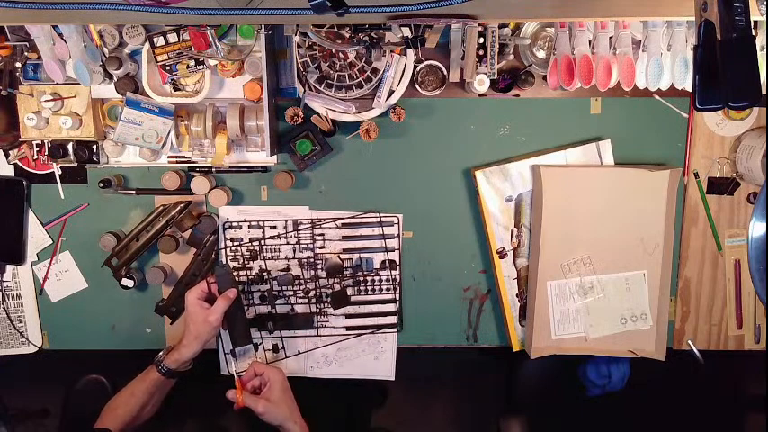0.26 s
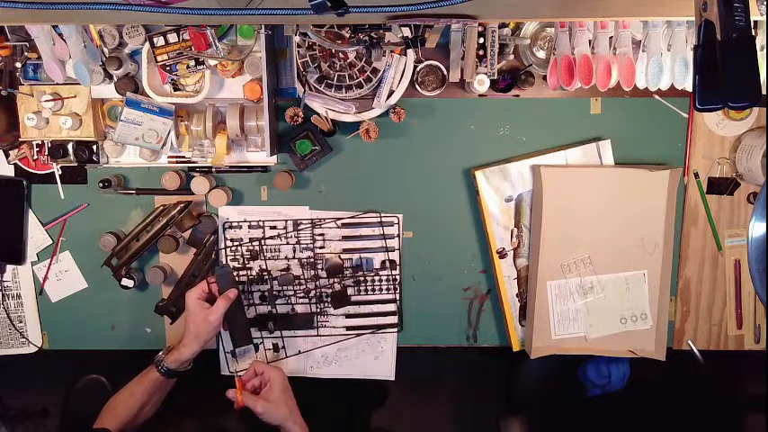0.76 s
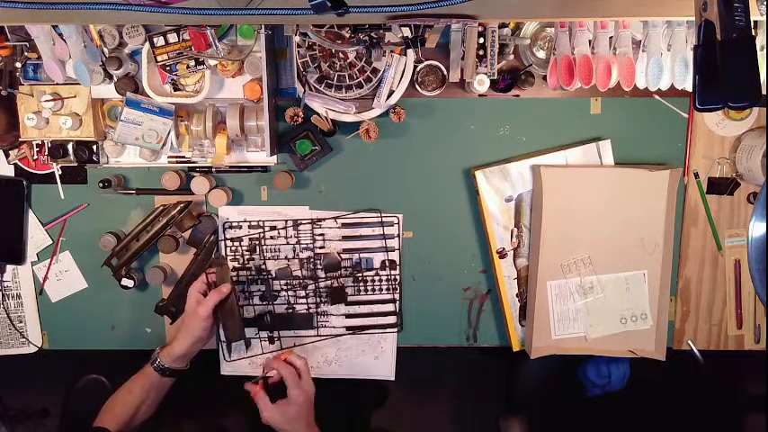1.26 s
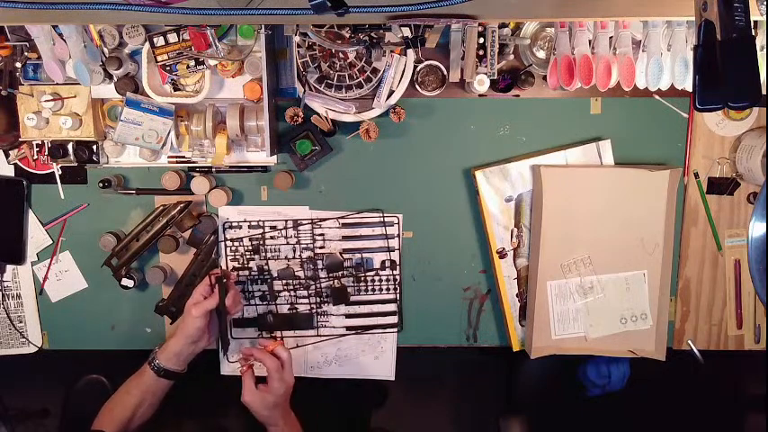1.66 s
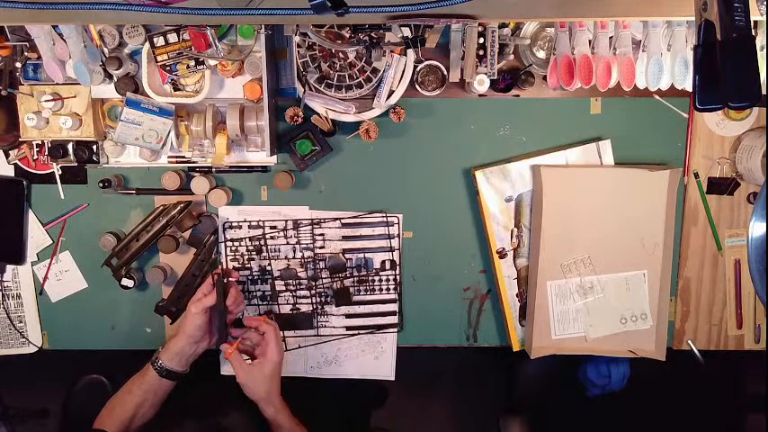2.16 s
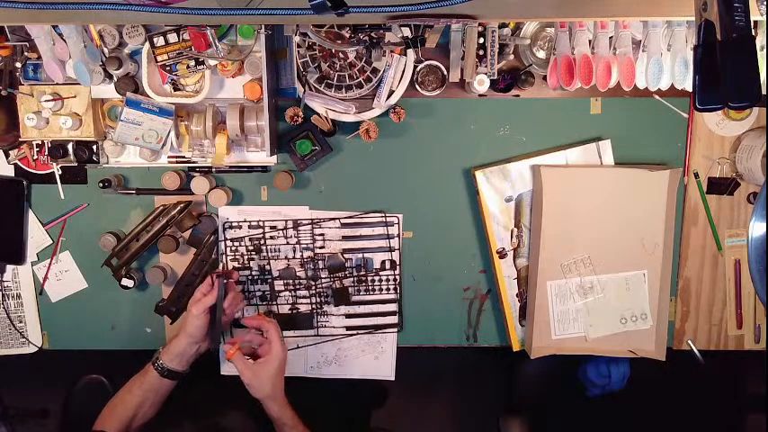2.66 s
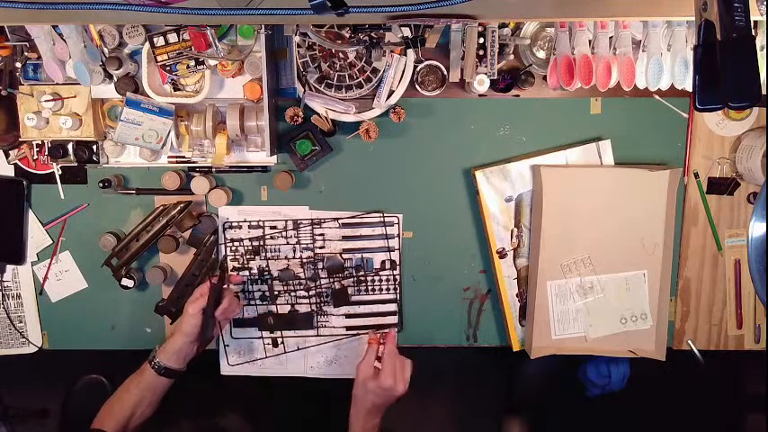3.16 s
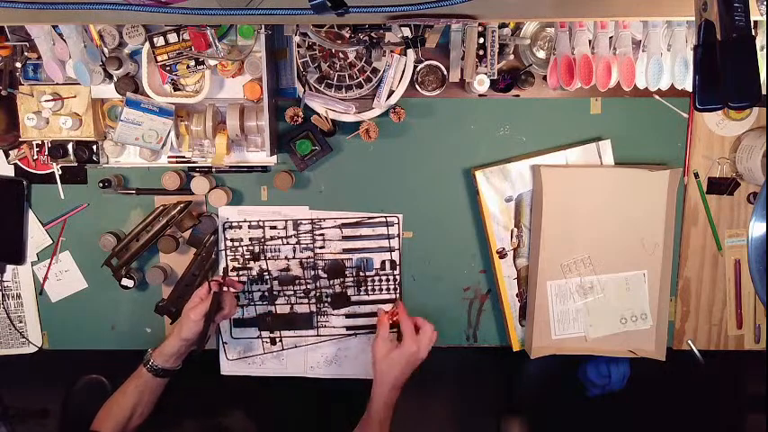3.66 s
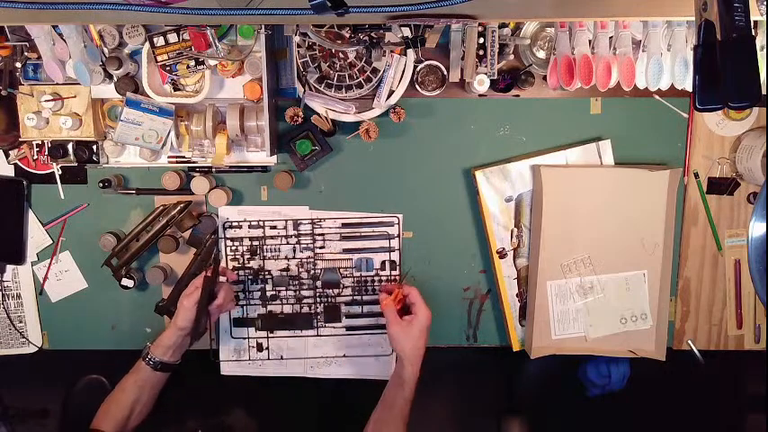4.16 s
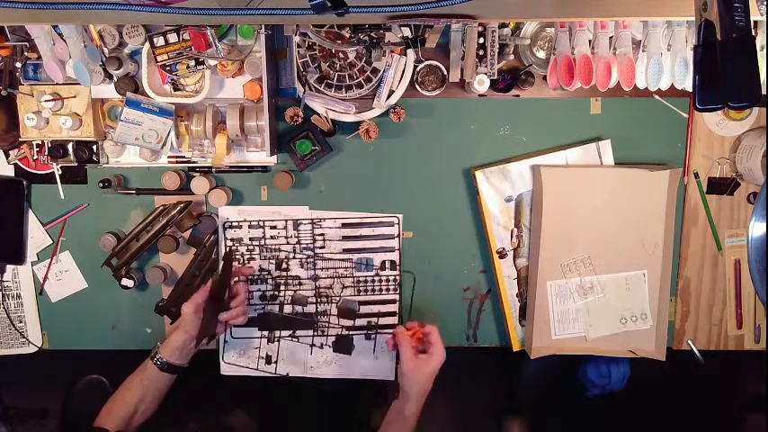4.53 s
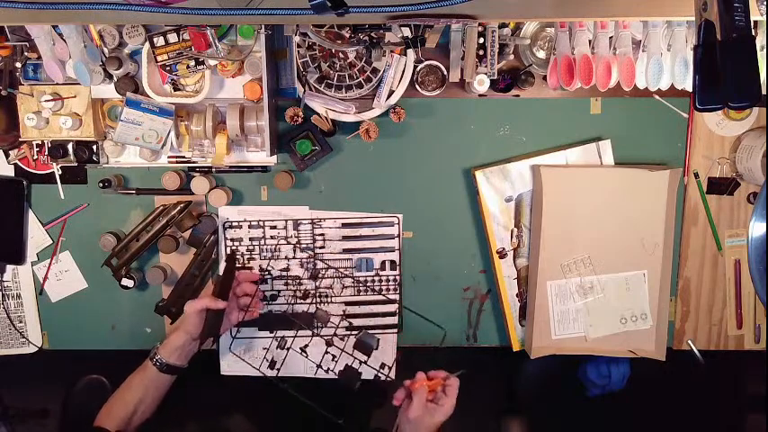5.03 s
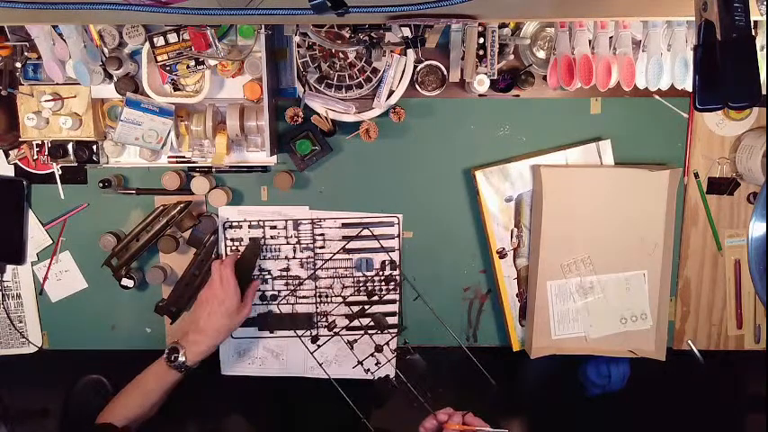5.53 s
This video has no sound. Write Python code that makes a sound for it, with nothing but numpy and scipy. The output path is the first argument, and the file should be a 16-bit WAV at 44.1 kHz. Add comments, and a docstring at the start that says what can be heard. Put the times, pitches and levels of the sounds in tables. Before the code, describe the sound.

One hard, bright snip of hand cutters in a quiet workroom, followed by sparse plastic ticks, finger rustles and a light clatter on the desk.

```python
"""Plastic part snipped from its frame

Cutters snip the part in a small, damped room: noise cracks, and the jaws and plastic stub ring as modes.
The part then ticks and rustles in the fingers (shaped noise); the lifted frame knocks on the desk (modes).
A motor just under mains rate beats slowly with the mains hum (sines); a fan and a rush of air join in."""
import sys
import numpy as np
from scipy import signal
from scipy.fft import rfft, irfft
from scipy.io import wavfile
from scipy.ndimage import uniform_filter1d

SR = 44100
rng = np.random.default_rng(int(sys.argv[2]) if len(sys.argv) > 2 else 0)


def pcm_store(signal):
    """Save signal as 16-bit PCM."""
    levels = np.round(np.clip(np.atleast_2d(signal), -1, 1) * 32767)
    wavfile.write(sys.argv[1], SR, levels.astype(np.int16).T)


N = 255406

# snip stages: plastic tearing and parting, jaws slamming shut, two rebounds:
# (time [s], relative level [dB], decay constant [s])
SNIP_STAGES = [(0.6389, -8.5, 0.00094), (0.6396, -3, 0.00045), (0.6401, -1, 0.00022),
               (0.6409, -5.5, 0.00081), (0.6436, -11.5, 0.0023)]
# modes of jaws and stub: (frequency [Hz], relative level [dB], t60 [s])
JAW_MODES = [(526, -30.5, 0.086), (872, -19.5, 0.063), (1250, -17.5, 0.026), (2060, -13.5, 0.024),
             (3060, -5.5, 0.014), (3660, -10.5, 0.021), (5396, -16, 0.036), (6660, -9, 0.0077),
             (6730, -8.5, 0.0058), (6380, -26, 0.013), (8280, 3, 0.0087), (8970, -7.5, 0.014),
             (9270, -2, 0.023)]
# crack spectrum: (frequency [Hz], relative density [dB per Hz])
CRACK_SPECTRUM = [(240, -46), (500, -38), (900, -6), (1500, -18), (2100, -6), (4000, -6.5), (5000, -5),
                  (5600, 2.5), (6800, 4), (9300, -5), (10600, -5.5), (13000, -14), (16000, -35)]
CRACK_GAIN_DB, JAW_PEAK_DB = 7, -10.5

# small parts ticking:
# (time [s], dry peak [dB], brightest frequency [Hz], decay constant [s], body level [dB])
PART_TICKS = [(0.831, -51, 6300, .012, -20), (.9602, -43, 7600, 0.0011, -18), (1.253, -49, 6840, .003, -19),
              (1.4477, -34, 8000, 0.0028, -14), (1.4498, -27, 6600, 0.0067, -6),
              (1.47, -41, 7350, .004, 11), (1.499, -38, 7000, 0.0071, -3), (1.518, -44, 5600, .004, -9),
              (1.995, -39, 7800, 0.0087, -7), (2.188, -47.5, 7500, 0.014, -6),
              (2.215, -45.5, 7900, .005, 1), (2.559, -43.5, 7700, 0.0045, -17),
              (2.8655, -26.5, 7100, 0.0011, -22), (3.7194, -47, 8200, 0.0085, 5),
              (3.736, -42.5, 7060, 0.014, -10), (3.857, -44, 7440, 0.0083, -12),
              (4.1085, -40, 7400, 0.016, 0.5), (4.187, -55, 7050, .003, 4), (5.507, -46, 8500, .004, -12),
              (5.553, -50, 5400, .004, -17), (5.573, -44, 5330, .004, -18), (5.6283, -28, 7200, 0.003, -12)]
# thin pitched ticks: (time [s], dry peak [dB], pitch [Hz], decay constant [s])
PITCHED_TICKS = [(.926, -56, 9550, .005), (1.043, -55, 9700, .004), (1.487, -51, 8900, .004),
                 (2.273, -54.5, 8960, 0.017), (2.464, -54.5, 9600, 0.037), (2.586, -45, 8340, 0.006),
                 (4.112, -47, 5400, .008), (4.132, -48, 5330, 0.005), (4.62, -57, 9200, .01),
                 (5.73, -39, 5770, .0017)]
# dull bump of the frame under one tick:
# (time [s], dry peak [dB], brightest frequency [Hz], decay constant [s])
FRAME_BUMP = (3.736, -40, 1600, .013)
# distance below the top at which the hump is 6 dB down
TICK_OCTAVES, PITCHED_OCTAVES, BUMP_OCTAVES = 0.41, 0.094, 1
UPPER_SKIRT = 1.29  # the hump is this much wider above its top
TICK_BODY_HZ, PITCHED_BODY_DB, BUMP_BODY_DB = 2760, -30, -19

# frame on desk: (time [s], dry peak [dB], hardness [dB per octave], lift of the 3 kHz modes [dB])
FRAME_KNOCKS = [(1.507, -45.5, 2, -6), (1.521, -55, 1, -6), (4.234, -54, -5, 2), (4.292, -55, -5, -3),
                (4.383, -40.5, 5.5, -3), (4.409, -45, 7, -13), (4.451, -49, 0.5, -7), (5.428, -48, 2, -9),
                (5.6257, -29, 1.5, 3), (5.6305, -27, 6, 9), (5.673, -33, 4.5, -4), (5.677, -33.5, 2.5, 9),
                (5.684, -37.5, 10, 16), (5.762, -46, 0, -2), (5.782, -33, -0.5, 3)]
# frame modes, before grip detuning: (frequency [Hz], relative level [dB], freely ringing t60 [s])
FRAME_MODES = [(2250, -5, 0.023), (2390, 2, 0.092), (2500, -6, 0.03), (3075, -4, 0.024),
               (2866, -7.5, 0.035), (4120, -4, 0.012), (5000, -5, 0.021), (5530, -5.5, 0.022),
               (6800, -9, 0.017), (7520, -8, 0.039), (8630, -13, .02), (9100, -14, 0.015)]
GRIP_DETUNE = .012  # spread of each mode's frequency from knock to knock, as a share
# a lighter knock leaves the frame resting on the desk, ringing this share as long
LIFTS_OFF_DB, RESTING_RING = -40, .5
# contact decay constant at hardness 0; hardness step that halves it [dB per octave]
KNOCK_S, HALVING_DB = .005, 10

# fingers sliding over plastic, one list per slide: (time [s], level [dB])
FINGER_SLIDES = [
    [(.8, -70), (.86, -62.5), (1., -77), (1.14, -66), (1.22, -67), (1.3, -64.5), (1.42, -67)],
    [(2.17, -65), (2.35, -80), (2.45, -70), (2.6, -72)],
    [(3.72, -62), (3.74, -51), (3.77, -70)],
    [(4.17, -60), (4.27, -73)],
    [(4.76, -82), (4.82, -66), (4.88, -82)],
    [(5.5, -57.5), (5.62, -58), (5.7, -52.5), (5.76, -53), (5.79, -51)],
]

# reverberation: (frequency [Hz], t60 [s])
ROOM_T60 = [(500, 0.31), (2000, 0.13), (6000, 0.14), (12000, 0.11)]
ROOM_DB, ROOM_BUILDUP_S = -6, .004

# motor and mains tones and their sums: (motor multiple, mains multiple, rms [dB])
HUM_TONES = [(1, 0, -55), (0, 1, -61), (0, 2, -68), (3, 0, -71), (1, 2, -72), (0, 3, -75), (4, 0, -76),
             (2, 2, -72), (0, 4, -68), (5, 0, -74), (25, 0, -81)]
MOTOR_HZ, MAINS_HZ, IN_STEP_S = 58.43, 59.97, .269
# blade tones, three blades per turn: (shaft multiple, rms [dB])
BLADE_TONES = [(3, -62), (6, -74), (9, -78), (12, -82)]
# whine and its sidebands one turn away: (offset [shaft multiples], rms [dB])
WHINE_TONES = [(-1, -76), (0, -74), (1, -79)]
FAN_HZ, FAN_WHINE_HZ = 22.39, 567.7

# air rush spectrum: (frequency [Hz], relative density [dB per Hz])
AIR_SPECTRUM = [(5, -13), (12, -2), (45, -2.5), (64, -2), (95, -6.5), (135, -13), (215, -10.5),
                (270, -12.5), (400, -17), (600, -17), (950, -20), (1250, -18.5), (2140, -23.5),
                (4500, -28.5), (7310, -25.5), (9500, -35), (12000, -41), (16000, -42.5)]
AIR_RMS_DB = -53.5

TOP_HZ = 15900
LEAD_S = .005  # silence ahead of the touch in each burst


def snip():
    """Cutters: a run of broad cracks; each also rings the jaws and the stub of plastic."""
    blows = np.zeros(2 ** 16)
    for time_s, db, decay_s in SNIP_STAGES:
        add(blows, time_s, burst(decay_s), db)
    blows = flatten(blows, width_hz=750)
    cracks = undb(CRACK_GAIN_DB) * colour(blows, CRACK_SPECTRUM)
    jaws = ring(blows, JAW_MODES)[:len(blows)]
    jaws = jaws * undb(JAW_PEAK_DB) / np.max(np.abs(jaws))
    return np.pad(cracks + jaws, (0, N - len(blows)))


def ticks():
    """Short contacts of small parts: broad ticks, thin pitched ones and one dull bump."""
    out = np.zeros(N)
    for time_s, db, hz, decay_s, body_db in PART_TICKS:
        add(out, time_s, tick(hz, TICK_OCTAVES, decay_s, body_db), db)
    for time_s, db, hz, decay_s in PITCHED_TICKS:
        add(out, time_s, tick(hz, PITCHED_OCTAVES, decay_s, PITCHED_BODY_DB), db)
    time_s, db, hz, decay_s = FRAME_BUMP
    add(out, time_s, tick(hz, BUMP_OCTAVES, decay_s, BUMP_BODY_DB), db)
    return out


def tick(hz, octaves, decay_s, body_db):
    """Heavily damped small part: a hump round the brightest pitch over the duller body of the piece."""
    axis_hz = np.geomspace(300, 20000, 80)
    skirt = np.where(axis_hz > hz, UPPER_SKIRT, 1)
    hump = undb(-6 * (np.log2(axis_hz / hz) / (max(octaves, .03) * skirt)) ** 2)
    body = undb(body_db - 8.1 * (np.log2(axis_hz / TICK_BODY_HZ) / 0.56) ** 2)
    # many small modes make each tick's colour lumpy
    ripple_db = 3.5 * rng.standard_normal(len(axis_hz))
    # the plastic radiates less above 10 kHz
    top_db = -9 * np.clip(np.log2(axis_hz / 10000), 0, 2)
    shape_db = 20 * np.log10(hump + body + .01) + top_db + ripple_db
    return colour(flatten(burst(decay_s)), np.c_[axis_hz, shape_db])


def knocks():
    """Frame on desk: shared modes, balanced by hardness and spot struck; harder contact is shorter."""
    out = np.zeros(N)
    lowest_hz = FRAME_MODES[0][0]
    for time_s, db, hard_db, lift_db in FRAME_KNOCKS:
        ring_share = RESTING_RING if db < LIFTS_OFF_DB else 1
        modes = []
        for k, (hz, mode_db, t60_s) in enumerate(FRAME_MODES):
            gripped_hz = hz * (1 + GRIP_DETUNE * rng.standard_normal())
            struck_db = mode_db + hard_db * np.log2(hz / lowest_hz)
            if k in (3, 4):  # the modes near 3 kHz
                struck_db += lift_db
            modes.append((gripped_hz, struck_db, t60_s * ring_share))
        contact = burst(KNOCK_S * 2 ** (-hard_db / HALVING_DB))
        add(out, time_s, ring(flatten(contact), modes), db)
    return out


def rustle():
    """Fingers: dense tiny slips of skin on plastic, uneven in size."""
    grains = rng.standard_normal(N) * undb(3 * walk(90))
    grains = colour(grains, [(2000, -5.5), (4500, -2.0), (7000, 1.8), (10000, -7.5), (14000, -24)])
    grains = level(grains, 0)
    t, gain = np.arange(N) / SR, np.zeros(N)
    for slide in FINGER_SLIDES:
        time_s, db = np.transpose(slide)
        # 7 ms fades; the last level holds on briefly
        edge = np.clip(np.minimum(t - time_s[0], time_s[-1] + 0.022 - t) / 0.007, 0, 1)
        gain += edge * undb(np.interp(t, time_s, db))
    return grains * gain


def room(x):
    """Dense reflections from desk, shelves and walls; each octave fades at its own pace."""
    t, tail = np.arange(12000) / SR, 0
    hz, t60_s = np.transpose(ROOM_T60)
    for centre_hz in 250 * 2. ** np.arange(6.5):
        edges_hz = [centre_hz / np.sqrt(2), min(centre_hz * np.sqrt(2), 20000)]
        band = signal.butter(2, edges_hz, "band", fs=SR, output="sos")
        band_t60_s = np.interp(np.log(centre_hz), np.log(hz), t60_s)
        fade = np.exp(-np.log(1000) * t / band_t60_s)
        tail = tail + signal.sosfilt(band, rng.standard_normal(len(t))) * fade
    tail *= 1 - np.exp(-(t / ROOM_BUILDUP_S) ** 2)
    tail = colour(flatten(tail, width_hz=120), [(150, -20), (250, 0), (7000, 0), (16000, -9)])
    tail /= np.sqrt(np.sum(tail ** 2))
    return x + undb(ROOM_DB) * signal.fftconvolve(x, tail)[:N]


def motor_and_mains():
    """Steady tones; the two lowest throb as they drift in and out of step."""
    tones = []
    for m, k, db in HUM_TONES:
        # the two fundamentals start in phase at IN_STEP_S
        turn = (m + k > 1) * rng.random()
        tones.append((m * MOTOR_HZ + k * MAINS_HZ, db, turn))
    return sines(tones)


def fan():
    """Steady blade-passing tones, and a whine with sidebands one shaft turn away."""
    tones = [(k * FAN_HZ, db, rng.random()) for k, db in BLADE_TONES]
    tones += [(FAN_WHINE_HZ + k * FAN_HZ, db, rng.random()) for k, db in WHINE_TONES]
    return sines(tones)


def air():
    """Smooth, distant rush: steady noise, strongest at low frequencies."""
    return level(colour(rng.standard_normal(N), AIR_SPECTRUM), AIR_RMS_DB)


def sines(tones):
    """Sum steady tones (frequency [Hz], rms [dB], phase at IN_STEP_S [turns])."""
    t = np.arange(N) / SR - IN_STEP_S
    return sum(np.sqrt(2) * undb(db) * np.cos(2 * np.pi * (hz * t + turn)) for hz, db, turn in tones)


def burst(decay_s, count=4096):
    """A contact: a sharp first touch, then noise that dies away."""
    t = np.arange(count) / SR - LEAD_S
    fade = np.exp(-np.abs(t) / np.clip(decay_s, 1e-4, .04))
    x = rng.standard_normal(count) * fade * (t >= 0)
    x[np.argmax(t >= 0)] = 2.5
    return x


def ring(x, modes):
    """Excite decaying modes (frequency [Hz], level [dB], t60 [s]), each with a random sign."""
    t = np.arange(8192) / SR
    body = np.zeros(len(t))
    for hz, db, t60_s in modes:
        fade = np.exp(-np.log(1000) * t / t60_s)
        body += rng.choice([-1, 1]) * undb(db) * fade * np.sin(2 * np.pi * hz * t)
    return signal.fftconvolve(x, body)


def add(track, time_s, x, peak_db):
    """Mix in a contact whose touch falls at time_s, scaled to a peak level."""
    i = int((time_s - LEAD_S) * SR)
    x = x[:N - i]
    track[i:i + len(x)] += x * undb(peak_db) / np.max(np.abs(x))


def walk(rate_hz):
    """Random levels held 1 / rate_hz seconds and smoothed; standard deviation 1."""
    k = int(SR / rate_hz)
    held = np.repeat(rng.standard_normal(N // k + 1), k)
    w = uniform_filter1d(uniform_filter1d(held, k), k)[:N]
    return w / np.std(w)


def undb(db):
    """Convert dB to an amplitude factor."""
    return 10 ** (np.asarray(db) / 20)


def level(x, rms_db):
    """Set the rms level."""
    return x * undb(rms_db) / np.sqrt(np.mean(x ** 2))


def colour(x, points):
    """Shape by (frequency [Hz], gain [dB]) points joined on a log-frequency axis."""
    hz, db = np.transpose(points)
    f = np.fft.rfftfreq(len(x), 1 / SR) + 1  # +1 avoids log 0
    return causal(x, np.log(undb(np.interp(np.log(f), np.log(hz), db))))


def flatten(x, width_hz=500):
    """Flatten the broad shape of a spectrum, keeping its fine grain."""
    smooth = uniform_filter1d(np.abs(rfft(x)) ** 2, size=int(width_hz * len(x) / SR))
    return causal(x, .5 * np.log(smooth.mean() / smooth))


def causal(x, log_gain):
    """Filter by a log gain per bin with the minimum phase, so nothing rings before a hit."""
    cepstrum = irfft(log_gain, len(x))
    # fold the negative-time half onto the positive
    cepstrum[1:len(x) // 2] *= 2
    cepstrum[len(x) // 2 + 1:] = 0
    return irfft(rfft(x) * np.exp(rfft(cepstrum)), len(x))


def scene():
    """Contacts heard through the room, over hum, fan and air; one channel."""
    contacts = snip() + ticks() + knocks() + rustle()
    return (room(contacts) + motor_and_mains() + fan() + air())[None]


def record(dry):
    """Cut the top steeply with an elliptic low-pass."""
    return signal.sosfilt(signal.ellip(10, .2, 60, TOP_HZ, fs=SR, output="sos"), dry)


dry = scene()
out = record(dry)
pcm_store(out)
```